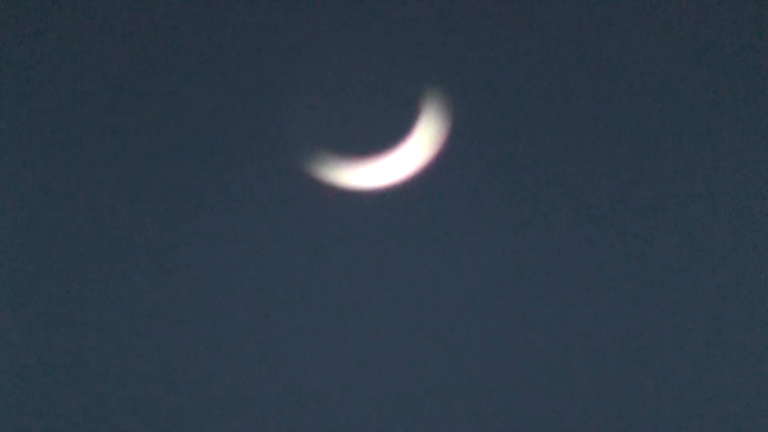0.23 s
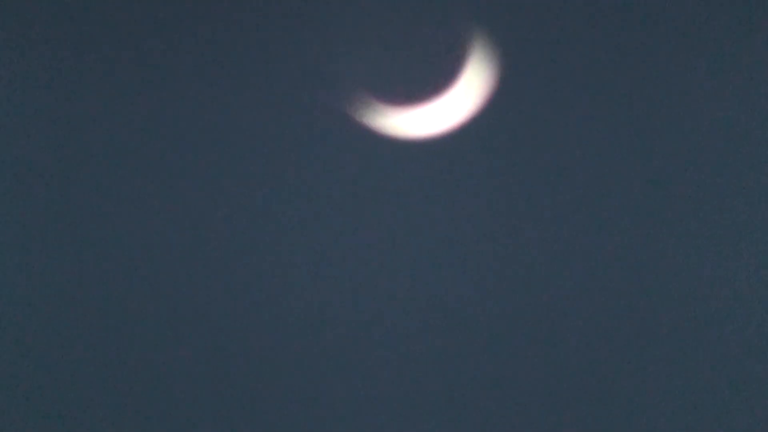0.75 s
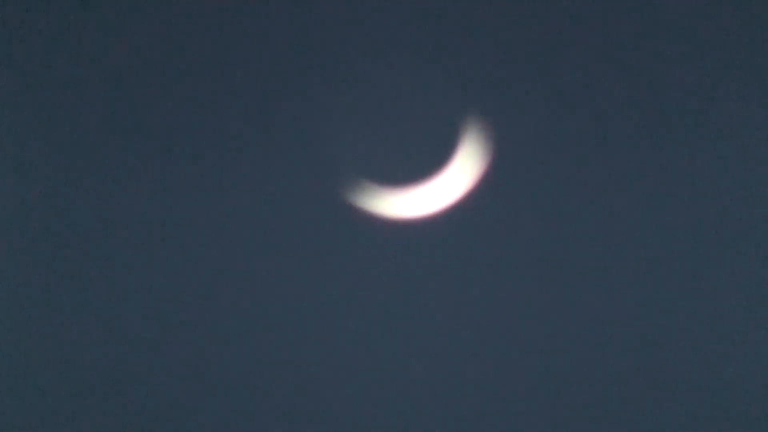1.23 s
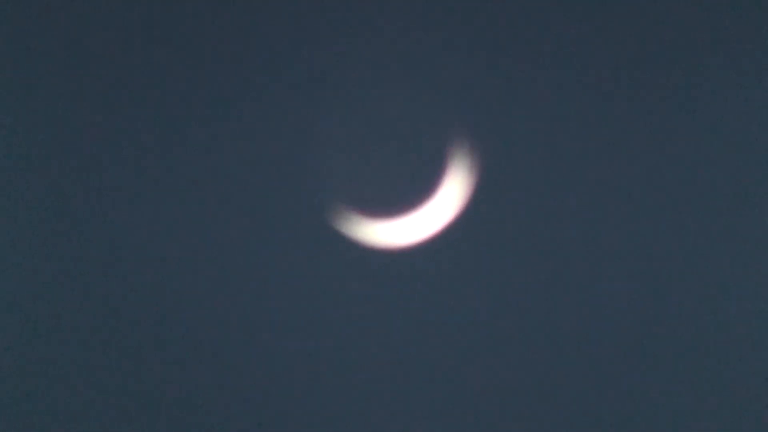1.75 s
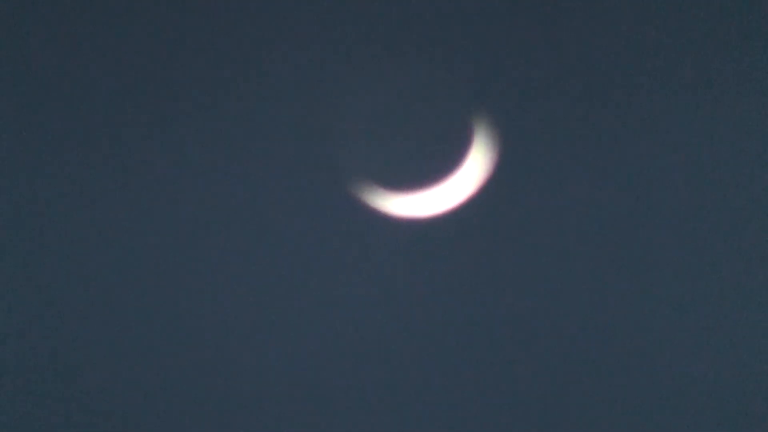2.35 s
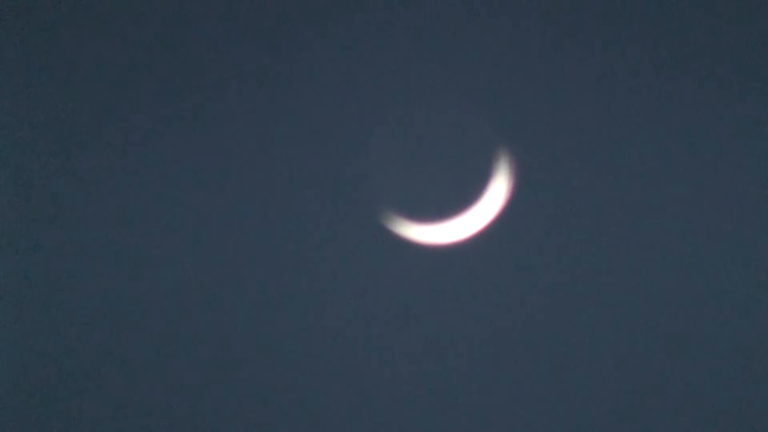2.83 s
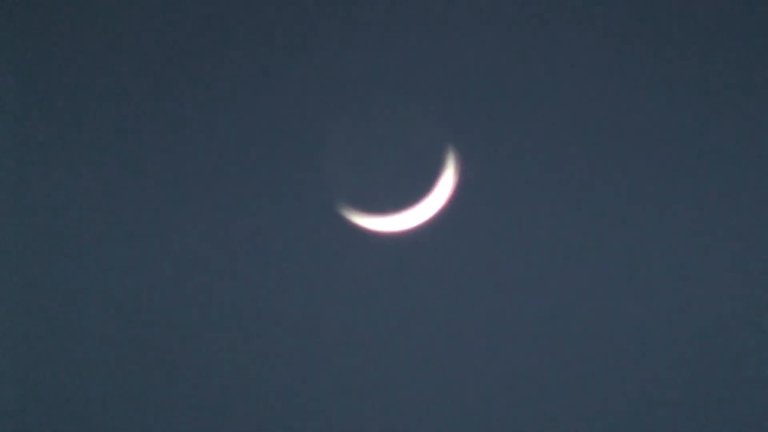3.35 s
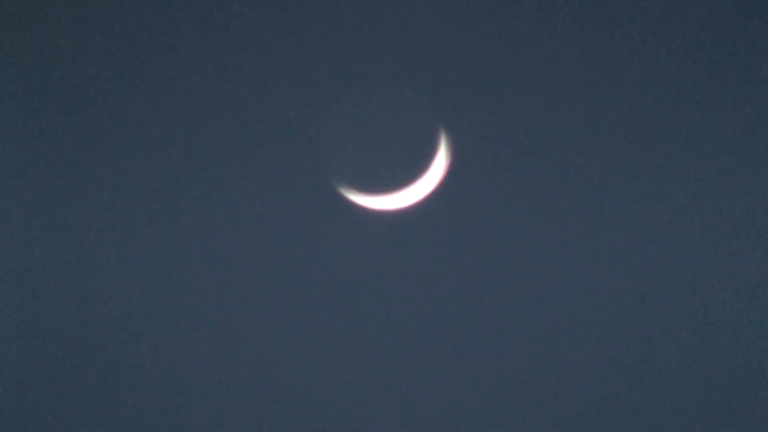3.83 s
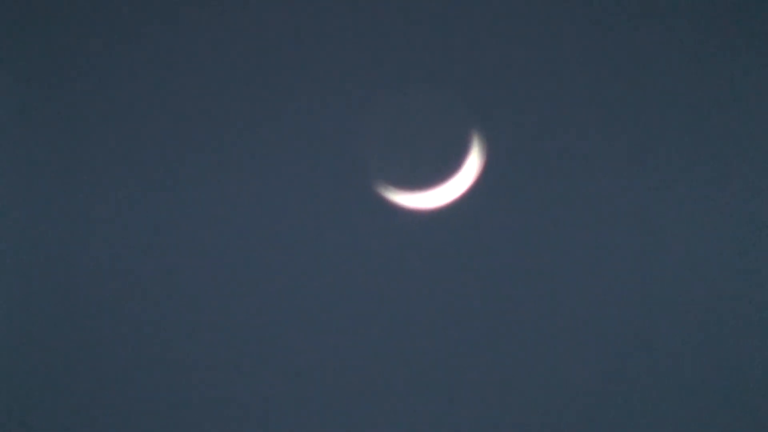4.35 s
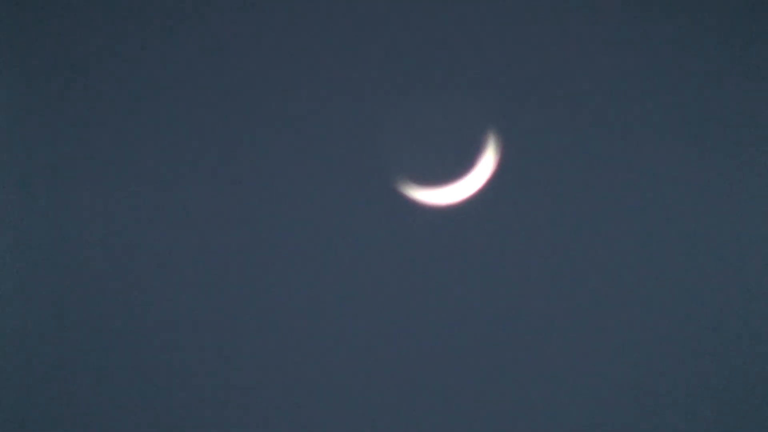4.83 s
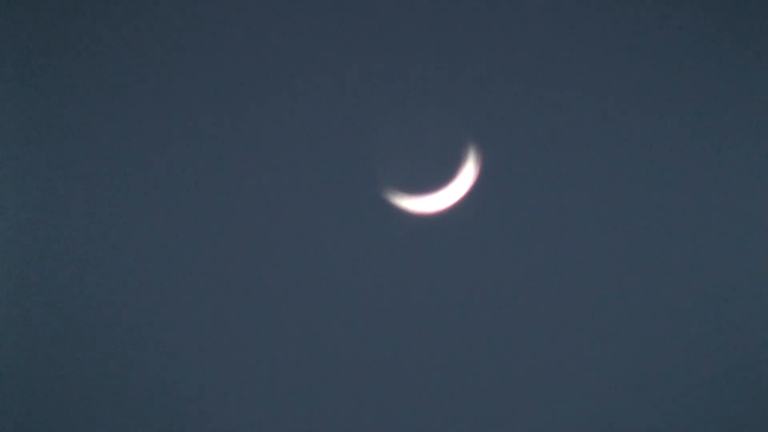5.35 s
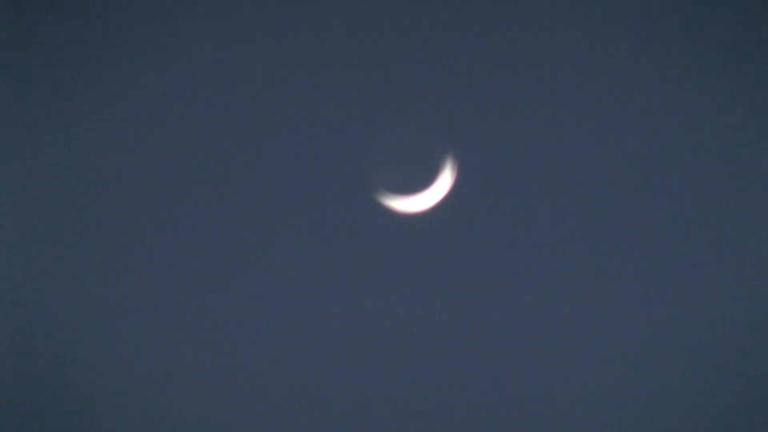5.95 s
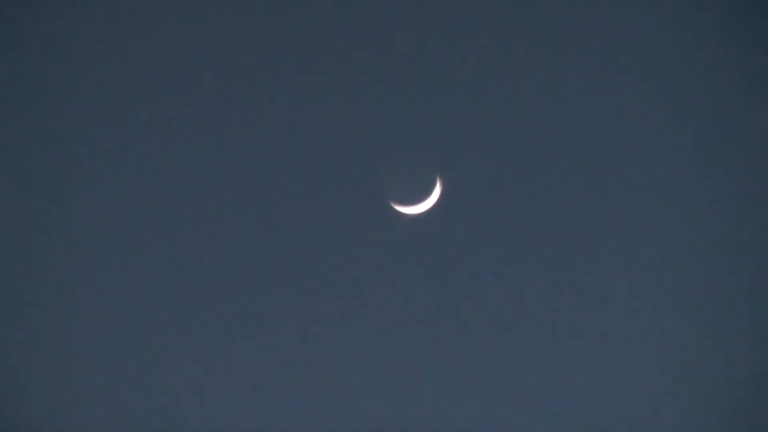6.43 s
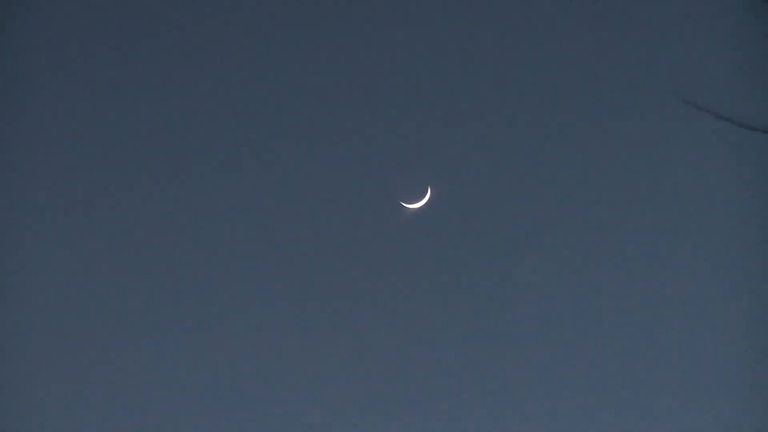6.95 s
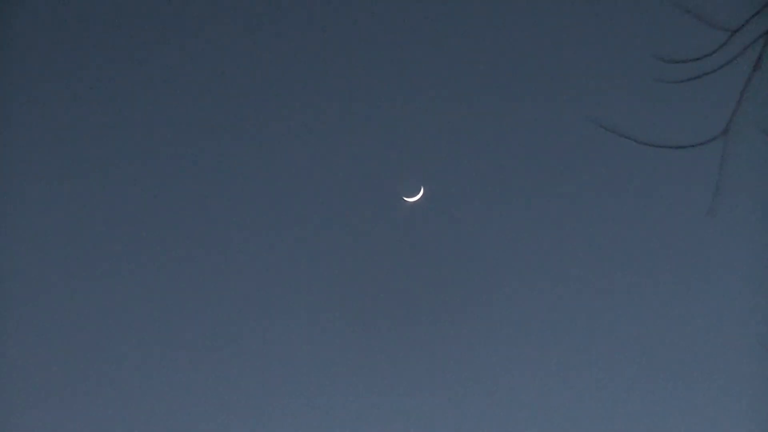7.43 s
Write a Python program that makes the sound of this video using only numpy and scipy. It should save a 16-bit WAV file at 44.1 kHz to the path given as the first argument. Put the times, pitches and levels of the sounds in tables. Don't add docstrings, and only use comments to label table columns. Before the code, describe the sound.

A blackbird sings mellow fluted phrases, then a buzzy trill and thin high twitter, echoing outdoors over low distant traffic rumble and soft hiss.

```python
import sys
import numpy as np
from scipy import signal
from scipy.fft import rfft, irfft, next_fast_len
from scipy.io import wavfile
from scipy.ndimage import uniform_filter1d, map_coordinates

SR = 44100
rng = np.random.default_rng(int(sys.argv[2]) if len(sys.argv) > 2 else 0)


def wrap_up_sound(samples):
    columns = np.atleast_2d(samples).T
    tamed = np.clip(columns, -1, 1)
    steps = np.round(tamed * 32767).astype(np.int16)
    wavfile.write(sys.argv[1], SR, steps)


def level_to_linear(level):
    exponent = np.asarray(level, float) / 20
    return 10 ** exponent


N = 339129

# t/s, centre f/Hz, level/dB, shake depth/1
LOW_TRILL = [
    (4.638, 2640, -40, 1),
    (4.68, 2746, -34.5, 0.8),
    (4.72, 2905, -33.5, 0.57),
    (4.755, 2894, -28.5, 0.65),
    (4.775, 2892, -28.5, 0.17),
    (4.8, 2918, -23, 0.1),
    (4.822, 2870, -35, 0.18),
    (4.84, 2807, -29, 0.2),
    (4.853, 2250, -46, 0.3),
]
# t/s, centre f/Hz, level/dB, shake depth/1
HIGH_TRILL = [
    [(5.953, 6580, -39, 0.65), (5.975, 6800, -38.5, 0.76), (6.04, 6880, -36.5, .95),
     (6.07, 6750, -43.5, 0.9), (6.103, 6850, -38, 0.94)],
    [(5.953, 8450, -55, 0.65), (6.0, 8400, -50, 0.96), (6.05, 8940, -54.5, 1), (6.103, 8560, -55.5, 0.87)],
]
# f/Hz, level of difference/dB
PORT_DIFFERENCE = [(6000, -30.5), (8500, -17), (10500, -7), (13000, 5)]


def blackbird():
    low_trill = song([LOW_TRILL], fast=(185, 290), beat=.35, flutter_db=2.2)
    high_trill = song(HIGH_TRILL, fast=(335, 270), slow=(60, 210), beat=.15, flutter_db=2.2)
    flute = coupled(song(fluted()) + low_trill, sum_db=-29.5) + rasp()
    twitter = coupled(song(thin(), fade=.001) + high_trill, sum_db=-26.0)
    low = grove(flute, direct_db=-0.66, walls_db=1.0, tail_db=-11.0, lean_db=7.5, alike=0.8)
    high = grove(twitter, direct_db=-1.5, walls_db=-2.5, tail_db=-7.0, lean_db=4.0, alike=0.97, bough_db=-3.5)
    both = low + high
    difference = filtered(both.mean(0), lambda f: 1j * level_to_linear(along(PORT_DIFFERENCE, f)))
    return both + np.outer([1, -1], difference)


# t/s, top f/Hz, level/dB
ARCHES = [
    (1.613, 3275, -24),
    (2.09, 3290, -24),
    (2.445, 3137, -24.5),
    (2.781, 3265, -25),
]
# t/s, top f/Hz, level/dB, stay/s, answer t/s
DROOPS = [
    (.708, 2827, -29, .018, .735),
    (1.155, 2717, -32.5, .028, 1.188),
]
# plateau t/s, plateau f/Hz, level/dB
STEPPED = [
    (3.208, 3085, -27.5),
    (3.588, 3065, -27),
    (3.886, 3105, -27),
]
# t/s, f/Hz, level/dB
OPENING = [
    [(.004, 2910, -46), (.025, 3100, -52), (.05, 3040, -53), (.072, 2700, -45)],
    [(.152, 2866, -31), (.165, 3096, -26.5), (.185, 2960, -27), (.197, 2820, -24.5), (.205, 2190, -49),
     (.213, 2140, -26.5)],
    [(.163, 4345, -58.5), (.175, 4640, -57), (.19, 4360, -53), (.2, 3600, -39.5), (.21, 3150, -37),
     (.222, 2860, -23)],
    [(.228, 2870, -48), (.235, 3340, -34.5), (.25, 2980, -33), (.275, 2760, -33.5), (.291, 2570, -42),
     (.3, 2225, -35.5), (.33, 2080, -48)],
]
# t/s, f/Hz, level/dB
RUN_UP = [
    (4.519, 3350, -32),
    (4.53, 2925, -32.5),
    (4.538, 2785, -35),
    (4.57, 2850, -31),
    (4.595, 2860, -30),
    (4.604, 2510, -35.5),
]
# t/s, length/s, f/Hz, slide/Hz, level/dB
PIPS = [
    (.225, .027, 2120, 50, -42),
    (4.51, .018, 2130, 119.5, -45),
    (4.606, 0.031, 2140, -50, -39),
]


def fluted():
    slack_hz = 2020
    answer_hz = 4010
    lead_hz = 2530
    notes = []
    for s, hz, db in ARCHES:
        notes.append(swoop((.034, 0, .02), (-19.5, -15.5), s, slack_hz, hz, slack_hz, db))
    for s, hz, db, stay, answer_s in DROOPS:
        notes.append(swoop((.013, stay, .064), (-20, -6.5), s, .95 * hz, hz, slack_hz, db))
        notes.append(swoop((.02, 0, .066), (-23, 9.5), answer_s, .95 * answer_hz, answer_hz, 2750, -48.5))
    for s, hz, db in STEPPED:
        notes.append(swoop((.011, .018, .007), (-5, 2), s - .039, slack_hz, lead_hz, .94 * lead_hz, db - 11.5))
        notes.append(swoop((.006, .042, .016), (0, -16), s, .88 * hz, hz, slack_hz, db))
    return notes + OPENING + [RUN_UP] + whistles(PIPS)


# t/s, from f/Hz, top f/Hz, held f/Hz, hold/s
FLICKS = [
    (5.276, 2890, 7200, 5020, 0.0099),
    (5.356, 5630, 7390, 6006, .03),
]
# t/s, from f/Hz, top f/Hz, end f/Hz, level/dB
CHIRPS = [
    (7.077, 6400, 7240, 6200, -32),
    (7.281, 6640, 7490, 6070, -34),
]
# t/s, f/Hz, level/dB
DUET = [
    (5.535, 4860, -44),
    (5.542, 6600, -35),
    (5.547, 7220, -34),
    (5.556, 5595, -31.5),
    (5.595, 5654, -33),
    (5.62, 5880, -34.5),
]
# t/s, f/Hz, level/dB
WARBLE = [
    (5.758, 7000, -45),
    (5.765, 7400, -40.5),
    (5.777, 6870, -34.5),
    (5.786, 6380, -34.5),
    (5.799, 6770, -35.5),
    (5.83, 6940, -34.5),
    (5.86, 6900, -40),
]
# t/s, length/s, f/Hz, slide/Hz, level/dB
HIGH_PIPS = [
    (7.063, 0.0087, 5110, 199, -39),
    (7.27, 0.0055, 6160, 138, -45),
]


def thin():
    notes = []
    for s, low, top, held, hold in FLICKS:
        notes.append(swoop((.012, 0, .0105), (-14, 0.5), s, low, top, held, -30.5, hold))
    for row in CHIRPS:
        notes.append(swoop((.008, 0, .022), (-8, -3.5), *row))
    duet_upper = np.array(DUET) * [1, 1.255, 1] + [-.004, 0, -5.5]
    warble_upper = np.array(WARBLE) * [1, 1.285, 1] + [0, 0, -14]
    return notes + [DUET, duet_upper, WARBLE, warble_upper] + whistles(HIGH_PIPS)


def swoop(timing, ends_db, s, from_hz, top_hz, land_hz, db, hold=0):
    rise, stay, fall = timing
    t = np.arange(0, rise + stay + fall + hold, .001)
    short = 1 - np.sin(np.pi / 2 * np.clip(t / rise, 0, 1))
    sunk = 1 - np.cos(np.pi / 2 * np.clip((t - rise - stay) / fall, 0, 1))
    hz = top_hz - (top_hz - from_hz) * short - (top_hz - land_hz) * sunk
    level = db + ends_db[0] * short + ends_db[1] * sunk ** 0.71
    return np.transpose([s + t, hz, level])


def whistles(rows):
    notes = []
    for s, length, hz, slide, db in rows:
        notes.append([(s, hz - slide / 2, db - 4),
                      (s + length / 2, hz, db),
                      (s + length, hz + slide / 2, db - 4)])
    return notes


OVERTONES = [-49, -47]
# f/Hz, level/dB
BEAK = [(4000, -1.5), (4950, 5), (5500, -6.5), (9000, -3), (10200, 9), (11300, -10), (12700, -9),
        (16000, -14)]


def song(notes, fast=(0, 0), slow=(0, 0), beat=0, flutter_db=1.0, fade=.002):
    out = np.zeros(N + SR)
    for rows in notes:
        start = rows[0][0] - fade
        t = start + np.arange(round((rows[-1][0] + fade - start) * SR)) / SR
        size = len(t)
        hz, db, *depth = curves(rows, t)
        hz = uniform_filter1d(hz, 110, mode="nearest")
        hz = hz * (1 + .004 * wobble(200, size))
        edges = np.clip(np.minimum(t - start, t[-1] - t) / fade, 0, 1) ** 2
        gain = level_to_linear(db + flutter_db * wobble(148, size)) * edges
        if depth:
            rate = fast[0] * (1 + .09 * wobble(60, size))
            shake = np.clip(depth[0], 0, 1) * np.sin(2 * np.pi * np.cumsum(rate) / SR)
            hz = hz + fast[1] * shake + slow[1] * np.sin(2 * np.pi * slow[0] * t)
            gain = gain * (1 + beat * shake)
        phase = 2 * np.pi * np.cumsum(hz) / SR
        tone = np.sin(phase)
        for k, level in enumerate(OVERTONES, start=3):
            rough = level_to_linear(3 * wobble(200, size))
            audible = k * hz < SR / 2.5
            tone += level_to_linear(level + along(BEAK, k * hz)) * rough * audible * np.sin(k * phase)
        out[round(start * SR):][:size] += np.sqrt(2) * gain * tone
    return out[:N]


def coupled(x, sum_db):
    z = signal.hilbert(x, next_fast_len(N))[:N]
    hoarse = level_to_linear(3 * wobble(250)) * np.exp(1.2j * wobble(200))
    envelope = uniform_filter1d(np.abs(z), 400) + 1e-4
    sum_tones = (z * z * hoarse).real / envelope
    return x + level_to_linear(sum_db) * filtered(sum_tones, lambda f: level_to_linear(along(BEAK, f)))


# t/s, length/s, level/dB
BREATHY = [
    (.188, 0.084, -57.5),
    (.77, 0.045, -61),
    (1.205, .06, -63.5),
]
# t/s, length/s, level/dB
SCRAPE = [
    (4.506, 0.035, -46.5),
    (4.598, 0.025, -45),
    (4.64, 0.097, -52),
]
# t/s, length/s, level/dB
WHEEZE = [
    (.18, 0.097, -67),
    (5.269, .027, -57),
    (5.354, .04, -67),
    (5.54, .095, -60),
    (5.762, .044, -66),
    (5.955, 0.17, -70),
    (7.095, .036, -80),
    (7.273, 0.049, -68),
]


def rasp():
    t = np.arange(N) / SR
    out = np.zeros(N)

    def air(hz, width):
        return unit(filtered(rng.standard_normal(N), lambda f: resonance(f, hz, width) ** 4))

    scrape = air(2900, 1604) + level_to_linear(-12.5) * air(2 * 2900, 2400)
    for bursts, noise in (BREATHY, air(4720, 3820)), (SCRAPE, scrape), (WHEEZE, air(9000, 9000)):
        for s, length, db in bursts:
            out += noise * level_to_linear(db) * np.clip(np.minimum(t - s, s + length - t) / 0.0057, 0, 1)
    return out * level_to_linear(1.9 * wobble(250))


# f/Hz, T60/s
GROVE = [(1500, 0.95), (3000, 0.92), (6500, 0.4), (10000, 0.74)]
# delay t/s, level/dB
WALLS = [
    (0.013, -5.5),
    (.034, -12),
    (.055, -19),
    (.085, -26.5),
    (.13, -17),
]


def grove(x, direct_db, walls_db, tail_db, lean_db, alike, bough_db=-11):
    hz, t, z = signal.stft(rng.standard_normal((2, SR)), SR, nperseg=256)
    rise = 1 - np.exp(-t / 0.0031)
    decay = level_to_linear(-60 * t / along(GROVE, hz)[:, None])
    tail = signal.istft(z * rise * decay, SR, nperseg=256)[1][:, :SR]
    tail = tail * level_to_linear(tail_db) / np.linalg.norm(tail[0])
    t = np.arange(SR) / SR
    spread = .008
    bumps = sum(level_to_linear(walls_db + db) * np.exp(-.5 * ((t - delay) / spread) ** 2) for delay, db in WALLS)
    a, b = tail + bumps * rng.standard_normal((2, SR)) / np.sqrt(2 * spread * SR)
    turn = np.arccos(np.clip(alike, -1, 1)) / 2
    paths = np.cos(turn) * a + np.sin(turn) * np.outer([1, -1], b)
    paths[:, 0] += level_to_linear(direct_db + np.array([lean_db, -lean_db]) / 2)
    paths[:, round(.00345 * SR)] += level_to_linear(direct_db + bough_db)
    return signal.fftconvolve(x[None], paths, axes=1)[:, :N]


# t/s, length/s, f/Hz, slide/Hz, level/dB
FAR = [
    (.43, 0.052, 3640, -60, -65),
    (.58, .07, 3560, -120, -62),
    (.83, 0.15, 7650, 144, -73),
    (2.24, 0.15, 4122, 40, -63.5),
    (2.41, .025, 3860, 0, -50.5),
    (2.545, 0.063, 4670, -83, -57),
    (2.7, .09, 3910, -60, -60),
    (5.79, 0.097, 5100, 350, -63),
]
# t/s, level/dB
CHORUS = [
    (0, -68.5),
    (1.1, -68),
    (1.4, -59),
    (2.05, -62),
    (2.15, -64),
    (3.6, -69.5),
    (5, -86.5),
    (6, -73.5),
    (7.69, -74),
]
# f/Hz, left-right likeness/1
ALIKE = [(40, .96), (90, .94), (180, .87), (350, .73), (700, .69), (1400, .65), (3000, .6), (6000, .7)]


def far_birds():
    calls = song(whistles(FAR), flutter_db=4.0, fade=.011)
    calls = grove(calls, direct_db=-0.5, walls_db=-6, tail_db=-4.0, lean_db=0, alike=.6)
    band = [(2900, -40), (3400, -5), (3900, 0), (4200, -5), (4700, -40)]  # f/Hz, level/dB
    blur = rush(band, ALIKE, patchy_db=1.5)
    blur_db, = curves(CHORUS, np.arange(N) / SR)
    return calls + level_to_linear(blur_db + wobble(7.7)) * blur


# t/s, level/dB
TRAFFIC = [
    (0.0, -42),
    (1.16, -43),
    (1.28, -41.5),
    (2.63, -43),
    (5.48, -42),
    (7.69, -39),
]
# f/Hz, level/dB per Hz
RUMBLE = [(12, -62), (20, -33.5), (65, -1.5), (208, 0.5), (238, -1.5), (352, -10), (403, -13), (500, -9.5),
          (650, -12.5), (1100, -120)]
# f/Hz, level/dB per Hz
ROAR = [(150, -22.5), (250, -4), (537, -5), (601, -4), (772, -3), (1450, -10), (2540, -25), (2920, -31.5),
        (5000, -46), (6500, -64), (11000, -120)]


def town():
    roar_db, = curves(TRAFFIC, np.arange(N) / SR)
    rumble = level_to_linear(-41.5 + 1.0 * wobble(1.52)) * rush(RUMBLE, ALIKE, patchy_db=0.23)
    roar = level_to_linear(roar_db + 1.5 + 0.35 * wobble(4.04)) * rush(ROAR, ALIKE, patchy_db=0.74)
    return rumble + roar


# f/Hz, level/dB
WHINE = [(12500, -93), (14050, -90), (14815, -94), (15563, -92)]
# f/Hz, level/dB per Hz
HISS = [(1760, -28), (3000, -0.5), (3380, -3.5), (5330, -12), (9330, -16.5), (13200, -18.5), (15100, -19.5),
        (16000, -11)]
# f/Hz, left-right likeness/1
PORTS = [(3000, .65), (6000, 0.85), (8000, 0.87), (10000, .52), (12500, 0.27), (15000, .18)]


def camera():
    t = np.arange(N) / SR
    motors = focus_motor() + zoom_motor() + settle()
    whine = np.zeros(N)
    for hz, db in WHINE:
        whine += level_to_linear(db + 2.5 * wobble(8)) * np.sin(2 * np.pi * hz * t + .8 * wobble(30))
    hiss = level_to_linear(-59.5) * rush(HISS, PORTS, patchy_db=.3)
    return motors * level_to_linear([[.8], [-.8]]) + whine + hiss


# first t/s, last t/s, level/dB
HUNTS = [
    (2.53, 2.58, -57),
    (2.73, 2.77, -49),
    (3.042, 3.41, -52),
    (3.486, 3.98, -52.5),
    (4.199, 4.2, -55.5),
]
# f/Hz, width/Hz, level/dB
BARREL = [(8020, 590, 1), (9500, 900, -2.5), (10800, 1100, -12)]


def focus_motor():
    t = np.arange(N) / SR
    scrape = np.zeros(N)
    frame_s, step_s, slip_s = .0401, .016, .004
    steps = [(s, db) for first, last, db in HUNTS for s in np.arange(first, last, frame_s)]
    stroke = 0.71 + np.exp(-t[:round(step_s * SR)] / 0.0025)
    for (s, db), (slip, size) in zip(steps, rng.standard_normal((len(steps), 2))):
        start = round((s + slip_s * slip) * SR)
        scrape[start:][:len(stroke)] += level_to_linear(db - 2.5 + 2.5 * size) * stroke

    def shell(f):
        return sum((-1) ** k * level_to_linear(db) * resonance(f, hz, w) for k, (hz, w, db) in enumerate(BARREL))

    return filtered(scrape * rng.standard_normal(N) * level_to_linear(1.5 * wobble(300)), shell)


# t/s, level/dB
ZOOM = [
    (0, -92),
    (5.3, -86),
    (5.8, -68),
    (6.9, -69),
    (7.5, -66),
    (7.69, -64),
]
# f/Hz, level/dB per Hz
GEARS = [(4000, -28), (5500, -4), (6800, 6), (8000, -2), (9400, -3), (10800, -5.5), (12500, -12.5),
         (15000, -28.5)]


def zoom_motor():
    t = np.arange(N) / SR
    whir = unit(filtered(rng.standard_normal(N), lambda f: level_to_linear(along(GEARS, f))))
    whir += level_to_linear(-10) * np.sin(2 * np.pi * 9475 * t + 1.5 * wobble(60))
    return level_to_linear(curves(ZOOM, t)[0] + wobble(12)) * whir


def settle():
    since = (np.arange(N) / SR - .582) % 1
    noise = unit(filtered(rng.standard_normal(N), lambda f: resonance(f, 6800, 4000) ** 2))
    return level_to_linear(-63 - 60 * since / .1) * noise


# f/Hz, left minus right level/dB
LEAN = [(60, -4.5), (180, -3), (550, 1), (1650, 0.5), (4970, -0.5), (15000, 0.5)]


def rush(spectrum, alike, patchy_db):
    z = signal.stft(rng.standard_normal((2, N)), nperseg=512)[2]
    field = uniform_filter1d(rng.standard_normal(z.shape[1:]), 6, 0)
    field = uniform_filter1d(field, 14, 1)
    pair = signal.istft(z * level_to_linear(patchy_db * unit(field)), nperseg=512)[1][:, :N]

    def mid_side(hz):
        turn = np.arccos(np.clip(along(alike, hz), -1, 1)) / 2
        return level_to_linear(along(spectrum, hz)) * [np.cos(turn), np.sin(turn)]

    mid, side = filtered(pair, mid_side)
    both = np.array([mid + side, mid - side])
    both = filtered(both, lambda hz: level_to_linear(along(LEAN, hz) * [[.5], [-.5]]))
    return both / np.sqrt(np.mean(both ** 2))


def resonance(f, hz, width):
    return 1j * f * width / (hz * hz - f * f + 1j * f * width)


def filtered(x, response):
    m = next_fast_len(N + SR // 2)
    return irfft(rfft(x, m) * response(np.fft.rfftfreq(m, 1 / SR)), m)[..., :N]


def wobble(rate, size=N):
    knots = rng.standard_normal(int(size * rate / SR) + 4)
    return map_coordinates(knots, [np.arange(size) * rate / SR])


def curves(rows, t):
    s, *cols = np.transpose(rows)
    return [np.interp(t, s, c) for c in cols]


def along(points, hz):
    f, v = np.transpose(points)
    return np.interp(np.log(hz + 1), np.log(f + 1), v)


def unit(x):
    return x / np.sqrt(np.mean(x ** 2) + 1e-20)


def scene():
    return blackbird() + far_birds() + town() + camera()


def roll_off(x):
    return signal.sosfilt(signal.butter(12, 16180, fs=SR, output="sos"), x)


def record(dry):
    mix = filtered(dry, lambda hz: hz < 15780)
    return roll_off(mix)


dry = scene()
out = record(dry)
wrap_up_sound(out)
```